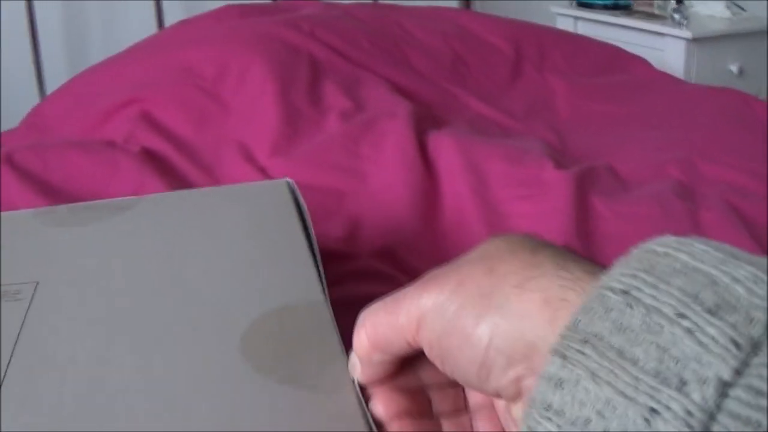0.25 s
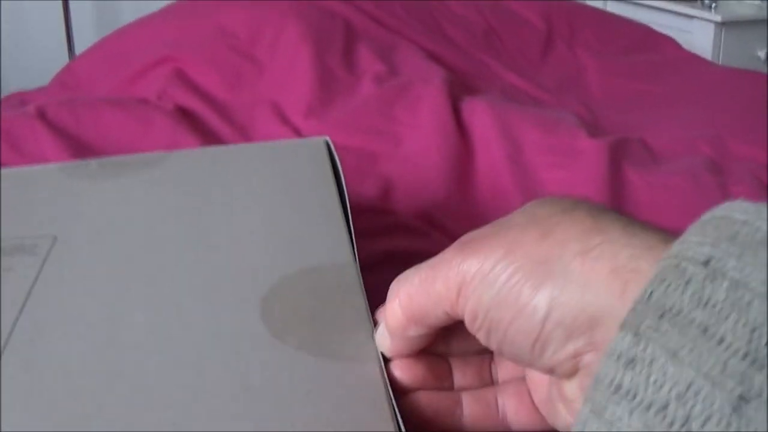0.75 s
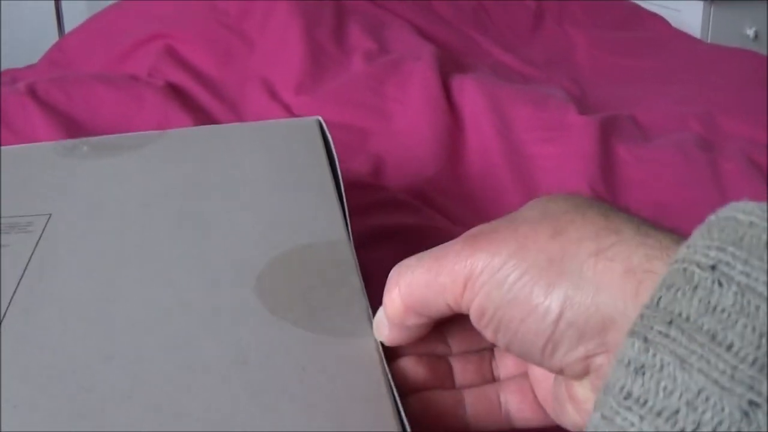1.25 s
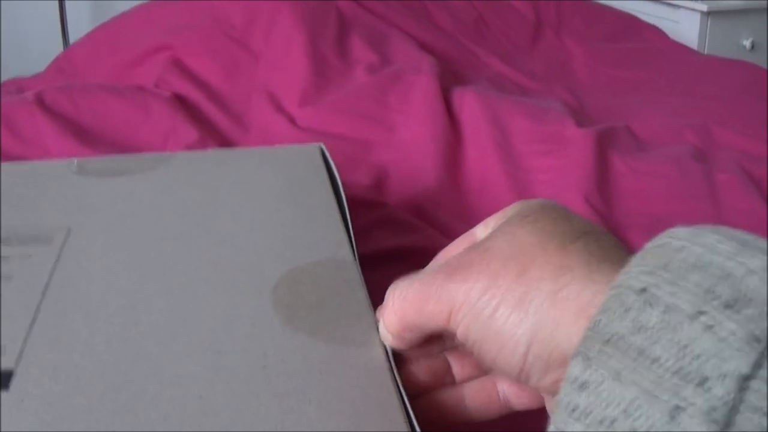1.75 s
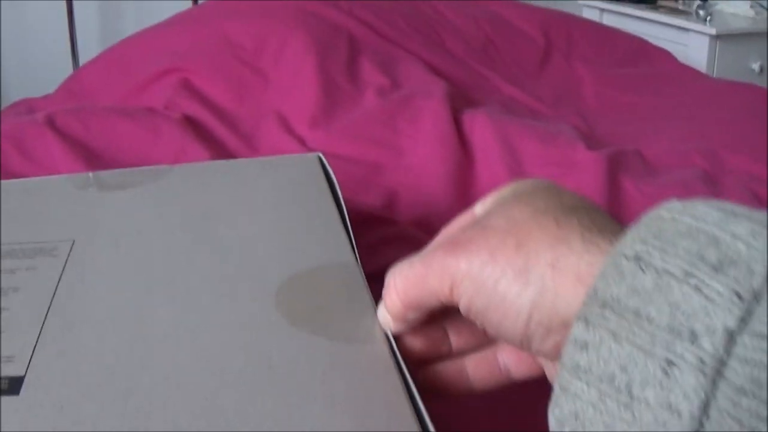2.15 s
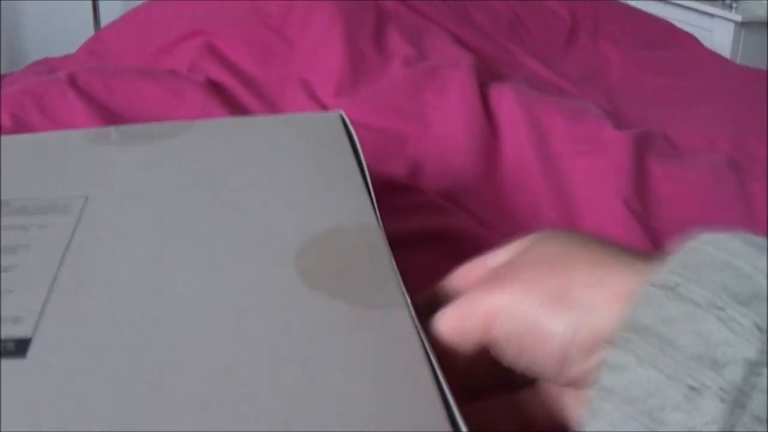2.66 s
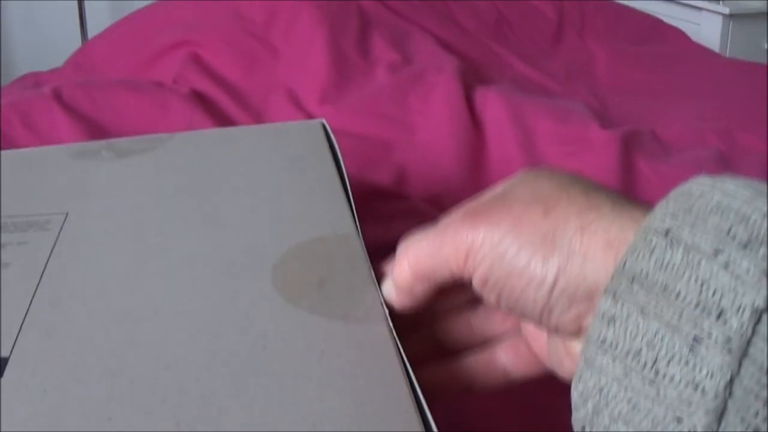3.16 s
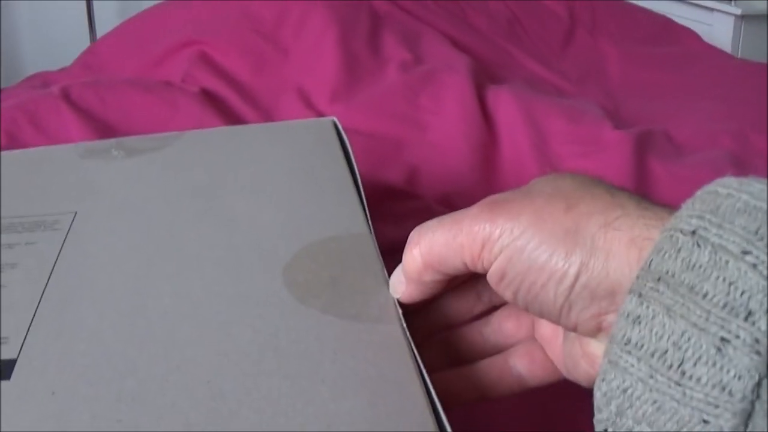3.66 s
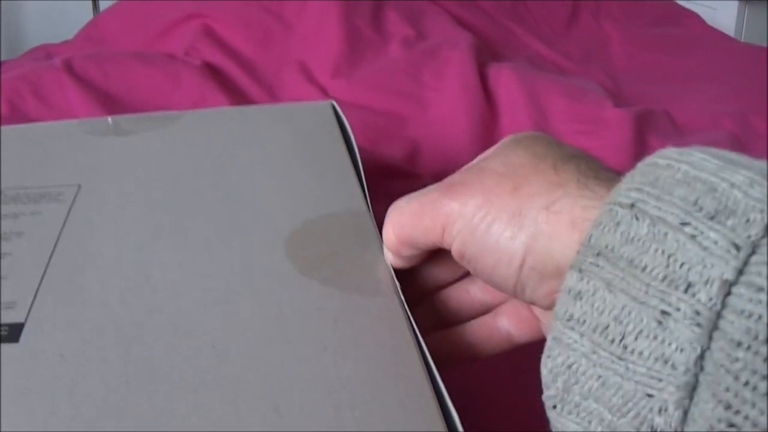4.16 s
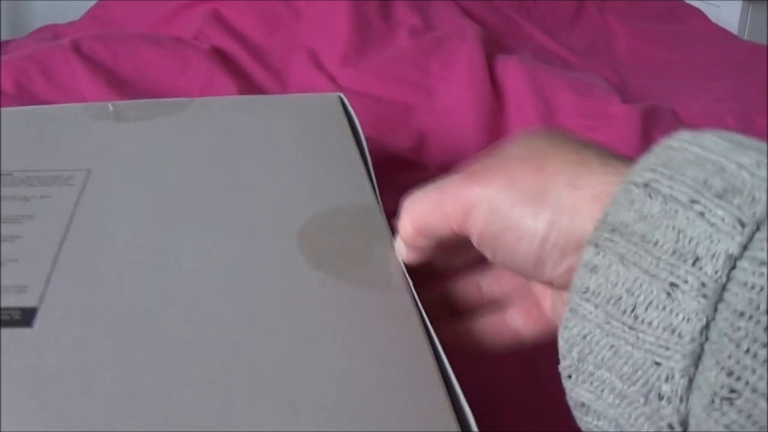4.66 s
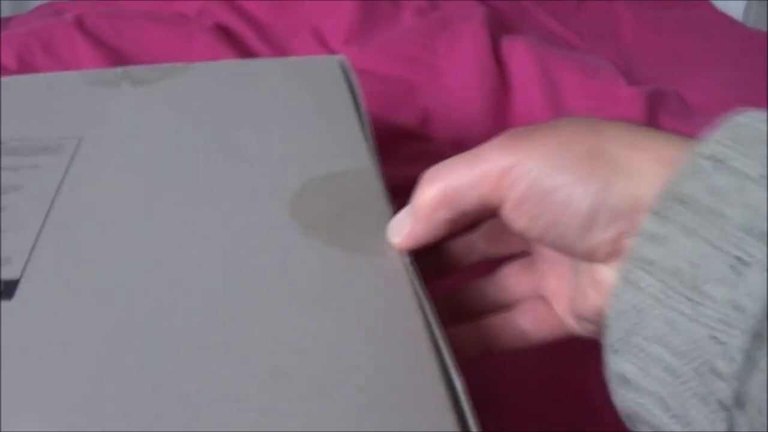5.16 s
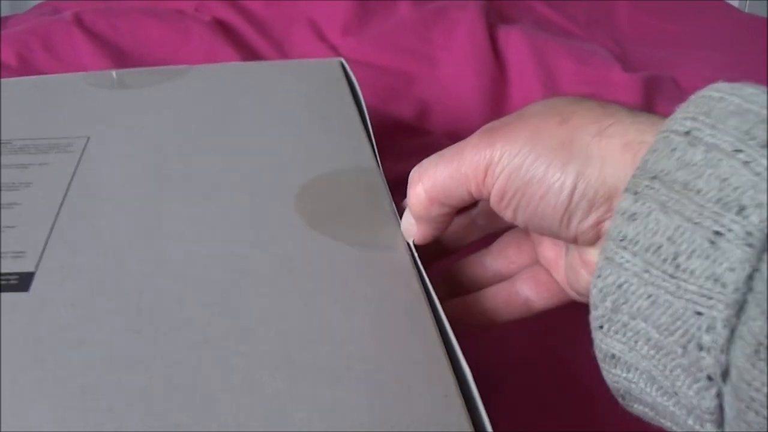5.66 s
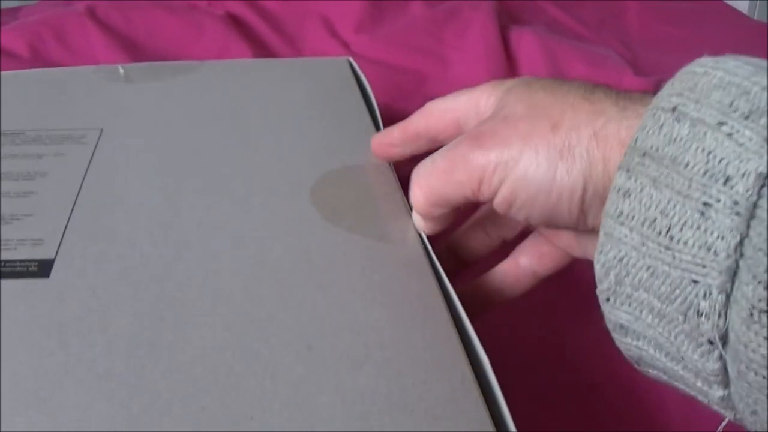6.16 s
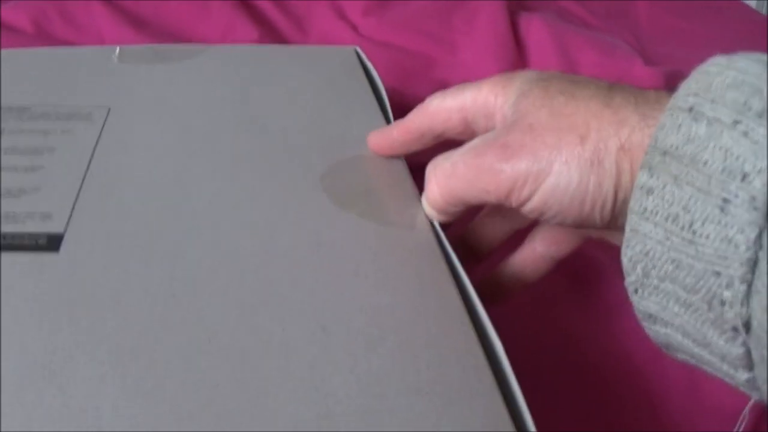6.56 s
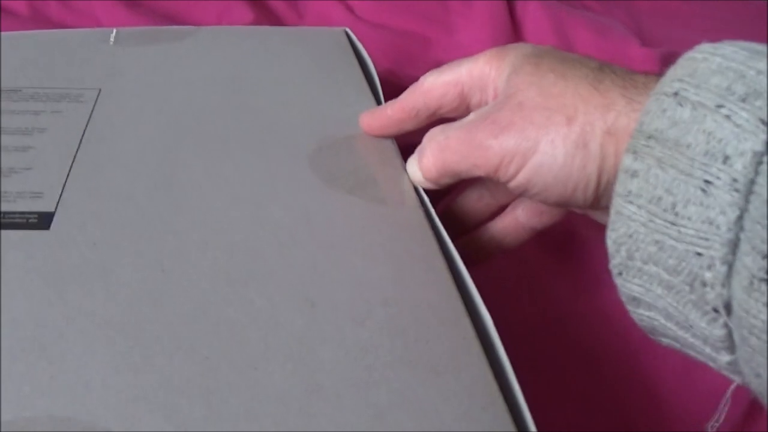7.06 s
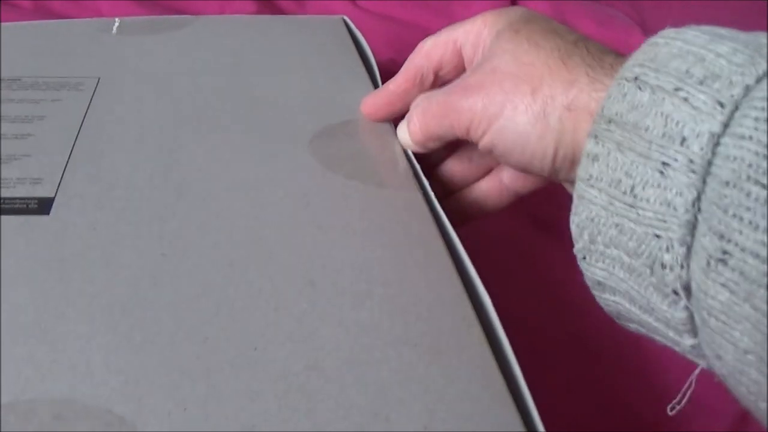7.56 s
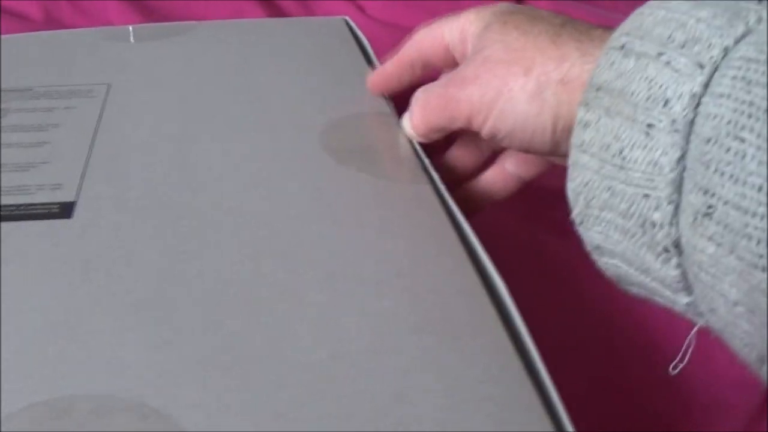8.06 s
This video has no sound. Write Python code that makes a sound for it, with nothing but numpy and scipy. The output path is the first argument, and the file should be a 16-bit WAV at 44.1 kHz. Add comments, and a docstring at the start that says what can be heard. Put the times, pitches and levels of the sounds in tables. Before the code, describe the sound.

Close, dry indoor sound with soft microphone hiss, a very faint high whine and tiny lens motor ticks about twenty-five times a second. From 0 to 0.3 s a nail rubs briskly on cardboard, airy and raspy with low box rumble; another stroke comes at 0.5, then small clicks and soft knocks until 1.25. Light rubbing leads to a sharp click at 1.75 and a loud bright snap with a hollow thump at 1.81. A crisp tick falls at 2.4, then a crackling, thudding cluster from 2.5 to 2.75 and a click at 2.9. A barely audible whirr follows at 3.1 amid quiet rubbing. Knocks and clicks come at 4.36 and, deeper, 4.91. Gentle strokes continue, with slight motor ticks and chirps from 5.5 to 7.05. The loudest crack hits at 6.97. Thin edge scraping follows around 7.5, a quick coarse flick at 8.0, and a last click at 8.12.

```python
"""A thumbnail rubs, picks and snaps at the flap of a cardboard box on a bed, close to a camera.
Rubbing is banded noise for skin, board and box plus random fibre clicks, shaped by stroke envelopes.
Snaps are crackle bursts with one sharp release; they and soft knocks excite the modes of the box.
An edge drag, a flick and two faint whirrs are shaped noise; snaps and ticks leave a short room tail.
The camera adds hiss, steady whines and the regular steps, a few louder ticks and chirps of its lens motor."""
import sys
import numpy as np
from scipy import signal
from scipy.io import wavfile
from scipy.ndimage import uniform_filter1d

SR = 44100
rng = np.random.default_rng(int(sys.argv[2]) if len(sys.argv) > 2 else 0)


def wav_out(sig):
    """Save sig, one row per channel (or a flat mono array), as 16-bit PCM at SR to the path in sys.argv[1]."""
    wavfile.write(sys.argv[1], SR, np.round(np.clip(np.atleast_2d(sig).T, -1, 1) * 32767).astype(np.int16))


N = 366030

# phase lead of left over right: f/Hz, phase/rad
PORT_PHASE = [(0, 0.24), (1210, -0.068), (1550, -0.67), (3880, 0.022), (16500, -0.019)]
# level of left over right: f/Hz, level/dB
PORT_BALANCE = [(60, 0.0), (150, 0.0), (380, 0.45), (950, 0.35), (2380, 0.0), (5980, 0.0), (15000, 0.0)]
# left-right likeness of near sounds: f/Hz, correlation/1
HAND_SAME = [(60, 1), (150, 0.99), (380, 0.97), (950, 0.53), (2400, 0.83), (6000, 0.96), (9000, 0.97),
             (11000, 1)]
# colour of rasping and tearing board: f/Hz, relative level/dB per Hz
BOARD = [(240, -21), (400, -0.5), (496, -8.5), (556, -12.5), (915, -10.5), (1190, -15), (1340, -12.5),
         (6000, -21.5), (7800, -46), (13200, -120)]


def gain_of(db):
    """Decibels to amplitude gain."""
    return 10 ** (np.asarray(db) / 20)


def evened(x):
    """Scales to rms 1."""
    return x / np.sqrt(np.mean(x ** 2) + 1e-20)


def read(points, hz):
    """Interpolates a table on a log-frequency axis."""
    f, value = np.transpose(points)
    return np.interp(np.log(hz + 1), np.log(f + 1), value)


def follow(rows, column):
    """Gain over time from a dB column; silent outside the rows."""
    rows = np.array(rows)
    t = np.arange(N) / SR
    return gain_of(np.interp(t, rows[:, 0], rows[:, column], -200, -200))


def add(mix, s, sound):
    """Mixes a sound in at s seconds, cut at the end."""
    part = mix[..., round(s * SR):][..., :sound.shape[-1]]
    part += sound[..., :part.shape[-1]]


def hiss(colour, same, patchy_db, flicker_db, size=512, count=N):
    """Two-port coloured noise, rms 1, with drifting spectral patches and a flicker shared by all bands."""
    frames, hz = 4 * count // size + 6, np.fft.rfftfreq(size, 1 / SR)
    a, b, c, d, patches = rng.standard_normal((frames, len(hz), 5)).T
    patches = uniform_filter1d(patches, 8, 0)  # over bins
    patches = evened(uniform_filter1d(patches, 10, 1))  # over frames
    flicker = evened(uniform_filter1d(rng.standard_normal(frames), 3))

    alike = np.clip(read(same, hz), -1, 1)[:, None]
    left = a + 1j * b
    right = alike * left + np.sqrt(1 - alike ** 2) * (c + 1j * d)
    ports = gain_of(read(PORT_BALANCE, hz) / 2) * np.exp(.5j * read(PORT_PHASE, hz))
    spectrum = np.array([left, right]) * np.array([ports, 1 / ports])[..., None]

    shape_db = np.where(hz <= colour[-1][0], read(colour, hz), -200)
    spectrum *= gain_of(shape_db[:, None] + patchy_db * patches + flicker_db * flicker)
    noise = signal.istft(spectrum, nperseg=size, noverlap=3 * size // 4)[1]
    return evened(noise[:, :count])


def peaked(resonances):
    """Power spectrum of a few resonances, as f/Hz and level/dB per Hz."""
    hz = np.geomspace(300, 15700, 500)
    power = sum(gain_of(2 * db) / (1 + (2 * (hz - f) / width) ** 2) ** 2 for f, width, db in resonances)
    return np.c_[hz, 10 * np.log10(power)]


def coloured(x, shape_db):
    """Causal filter: minimum phase from a gain in dB on 1025 bins."""
    both_sides_db = np.r_[shape_db, shape_db[-2:0:-1]]
    log_gain = np.log(gain_of(np.maximum(both_sides_db, -100)))
    taps = np.fft.ifft(np.exp(signal.hilbert(log_gain).conj())).real[:1024]
    return signal.fftconvolve(x, taps)


def swell(t, peak_s, rise_s, fall_s, rise_power=1., fall_power=1.):
    """Gesture level in dB: 0 at its peak, -10 one rise before and one fall after; powers > 1 round it."""
    early = t < peak_s
    away = abs(t - peak_s) / np.where(early, max(rise_s, .002), max(fall_s, .002))
    return -10 * away ** np.where(early, rise_power, fall_power)


def rings(blow, weight_db, damping):
    """Box modes excited by a short blow, peak 1; random shifts of pitch and phase vary each blow."""
    # box modes: nominal f/Hz, level/dB before weighting, t60/s before the damping factor
    box_modes = [(61.6, -6, 0.12), (92.4, 2, 0.13), (117.5, -6, 0.2), (144, -0.5, 0.045), (188, 2, 0.12),
                 (250.6, 3.5, 0.083), (357, -3.5, 0.1), (416, -7, 0.097), (590, -6.5, 0.071),
                 (778, -6, 0.038), (1090, -9.5, 0.032), (1370, -17.5, 0.03), (1550, -4, 0.019),
                 (2070, -14.5, 0.042), (2740, -16, 0.068)]
    hz, db, t60 = np.transpose(box_modes)[..., None]
    t = np.arange(SR // 4) / SR
    shift, lag = rng.standard_normal((2, len(box_modes), 1))
    swing = np.sin(2 * np.pi * hz * (1 + 0.04 * shift) * t + 0.8 * lag)
    rise = 1 - np.exp(-t * hz / 0.35)  # a panel needs part of a cycle to swing up
    modes = gain_of(db + weight_db(hz) - 60 * t / (t60 * damping)) * rise * swing
    sound = signal.fftconvolve(modes.sum(0), blow)
    return sound / abs(sound).max()


def camera():
    """Room and microphone hiss, steady sine whines, decaying lens motor steps and short tone chirps."""
    # whines: f/Hz, rms level/dB
    whine_tones = [(7801, -65), (7826, -73)]
    # ringing of a motor step: f/Hz, level re step/dB, t60/s
    step_rings = [(2805, -2, 0.032), (3270, 2, 0.016)]
    # lens motor chirps: t/s, peak level/dB, length/ms
    chirp_rows = [(6.534, -47, 17), (6.554, -48, 18), (6.652, -44, 13), (6.777, -48, 20), (6.8543, -47, 14),
                  (6.8788, -53, 18), (7.0549, -44.5, 13)]
    # room and microphone hiss: f/Hz, relative level/dB per Hz
    air_colour = [(12, -30), (20, 2.5), (85, -9), (104, -11.5), (584, -4), (635, -6.5), (710, -7.5),
                  (1280, -10), (1780, -11.5), (2290, -12), (3200, -12), (6430, -20), (7600, -18),
                  (8270, -23.5), (15700, -20.5)]
    # left-right likeness of that hiss: f/Hz, correlation/1
    air_same = [(60, 1), (150, 0.62), (380, 0.24), (950, 0.027), (2400, 0.055), (6000, 0.17), (9000, 0.79),
                (11000, 1)]
    first_step_s, step_period_s, step_db, step_spread_db = .014, 1 / 25, -52, 1.5
    chirp_hz, air_db = 2770, -54

    t = np.arange(N) / SR
    out = sum(gain_of(db) * np.sqrt(2) * np.sin(2 * np.pi * hz * t) for hz, db in whine_tones)

    at = np.round(np.arange(first_step_s, N / SR, step_period_s) * SR).astype(int)
    t = np.arange(800) / SR
    for hz, db, t60 in step_rings:
        steps = np.zeros(N)
        steps[at] = gain_of(step_db + step_spread_db * rng.standard_normal(len(at)))
        ring = gain_of(db - 60 * t / t60) * np.sin(2 * np.pi * hz * t)
        out += signal.oaconvolve(steps, ring)[:N]

    for s, db, ms in chirp_rows:
        t = np.arange(round(ms * SR / 1000)) / SR
        add(out, s, gain_of(db) * np.hanning(len(t)) * np.sin(2 * np.pi * chirp_hz * t))

    return out + gain_of(air_db) * hiss(air_colour, air_same, patchy_db=1.5, flicker_db=0.5, size=1024)


def whirr():
    """Faint fuzzy whirrs: noise in one narrow band with short linear fades."""
    # whirrs: start t/s, length/s, level/dB, f/Hz
    whirr_rows = [(3.11, .34, -60.5, 1334), (7.888, .1, -58, 1420)]
    fade_s, width_hz = .01, 100
    out = np.zeros((2, N))
    for s, length, db, hz in whirr_rows:
        t = np.arange(round(length * SR)) / SR
        band = hiss(peaked([(hz, width_hz, 0)]), HAND_SAME, patchy_db=.3, flicker_db=.8, count=len(t))
        fade = np.clip(np.minimum(t, length - t) / fade_s, 0, 1)
        add(out, s, gain_of(db) * fade * band)
    return out


def bedroom(x, t60=0.17, treble_t60=0.038):
    """Sparse reflections of random sign; cloth swallows the treble first."""
    taps = np.zeros((2, SR // 4))
    slots = np.arange(120, SR // 4 - 20, 20)
    at = slots + rng.integers(0, 20, (2, (SR // 4 - 121) // 20))
    np.put_along_axis(taps, at, rng.choice([-1., 1.], at.shape), 1)

    hz, t, (mid, side) = signal.stft(taps, SR, nperseg=128)
    # the tail is widest around 5 kHz, narrower in bass and top treble
    side = side * gain_of(read([(300, -12), (1500, -6), (5000, -3), (10000, -10)], hz))[:, None]
    decay_s = read([(800, t60), (6000, treble_t60)], hz)[:, None]
    faded = np.array([mid + side, mid - side]) * gain_of(-60 * t / decay_s)
    tail = signal.istft(faded, SR, nperseg=128)[1]
    return signal.fftconvolve(x[None], tail / np.linalg.norm(tail[0]), axes=1)[:, :N]


def flick():
    """One quick flick across the board: a short coarse noise scrape."""
    # scrape colour: f/Hz, relative level/dB per Hz
    scrape_colour = [(180, -36), (300, -12), (554, -11), (852, -1), (1070, -19), (1620, -4), (2580, -5.5),
                     (3050, -6), (4460, -4.5), (6210, -5.5), (7210, -9.5), (10400, -10), (15700, -23)]
    peak_s, level_db, rise_s, fall_s, lead_s = 8.01, -26.5, .012, .014, .05
    t = np.arange(SR // 4) / SR
    scrape = hiss(scrape_colour, HAND_SAME, patchy_db=1.0, flicker_db=-0.5, size=128, count=len(t))
    level = gain_of(level_db + swell(t, lead_s, rise_s, fall_s, rise_power=2.2))
    out = np.zeros((2, N))
    add(out, peak_s - lead_s, scrape * level)
    return out


def drag():
    """The nail drags along the cut edge: noise in three resonant bands."""
    # drag level: t/s, level/dB
    drag_levels = [(7.2, -61), (7.378, -55.5), (7.388, -48), (7.43, -56), (7.472, -44.5), (7.552, -45),
                   (7.59, -56), (7.68, -62), (7.742, -54), (7.85, -62)]
    # edge resonances: f/Hz, -6 dB width/Hz, level/dB
    edge_rings = [(4620, 510, 0), (6070, 700, -0.5), (8800, 500, -10)]
    return follow(drag_levels, 1) * hiss(peaked(edge_rings), HAND_SAME, patchy_db=1.5, flicker_db=0.9)


def knocks():
    """A soft push of about 2 ms rings the box modes, favouring those near one frequency."""
    # knocks on the box: t/s, peak level/dB, favoured f/Hz, damping as factor on t60
    knock_rows = [(0.599, -30, 250, 0.51), (0.651, -26.5, 159, 0.9), (0.67, -36, 102, 0.58),
                  (0.846, -29, 94.2, 1), (0.907, -28, 261, 0.97), (1.048, -27, 191, 0.98),
                  (1.232, -26.5, 88, 0.86), (1.75, -32.5, 240, 0.9), (1.812, -12, 172, 0.62),
                  (1.864, -38, 138, 0.9), (2.325, -29, 80.7, 0.77), (2.347, -31, 86.1, 1),
                  (2.398, -36, 164, 0.58), (2.527, -32, 188, 0.86), (2.617, -13.5, 158, 0.72),
                  (2.641, -23.5, 117, 0.74), (2.658, -15.5, 243, 0.69), (2.684, -31, 323, 0.48),
                  (2.89, -31.5, 253, 0.82), (3.146, -37, 352, 0.9), (3.581, -39.5, 185, 1),
                  (3.843, -40.5, 264, 0.93), (4.355, -23, 228, 1), (4.551, -46, 83.4, 0.53),
                  (4.848, -41, 200, 0.9), (4.912, -15.5, 80.7, 0.58), (4.95, -29, 186, 0.9),
                  (5.035, -33, 229, 1), (5.496, -39, 86.1, 0.76), (5.651, -37, 224, 1),
                  (6.966, -14, 117, 0.76), (7.385, -34.5, 128, 0.6), (7.499, -34, 93, 0.9),
                  (7.768, -38.5, 125, 0.43), (8.004, -37, 129, 0.97), (8.124, -34.5, 125, 0.9)]
    out, push = np.zeros(N), np.hanning(90)
    for s, db, deep_hz, damping in knock_rows:
        near = lambda f: -8. * abs(np.log2(f / deep_hz))  # dB
        add(out, s, gain_of(db) * rings(push, near, max(damping, .2)))
    return out


def fibres(per_s=500, spread_db=3.0):
    """Single board fibres tear at random, a few of them loudly: filtered impulses, rms 1."""
    size = gain_of(spread_db * np.minimum(rng.exponential(1, N), 4)) * rng.choice([-1, 1], N)
    tears = size * (rng.random(N) < per_s / SR)
    return evened(coloured(tears, read(BOARD, np.fft.rfftfreq(2048, 1 / SR)))[:N])


def contact():
    """Gains of hiss, rasp and rumble: resting hand, strokes and shudders add as powers."""
    # hand resting between strokes: t/s, skin hiss/dB, board rasp/dB, box rumble/dB
    resting_rows = [(0, -60, -48, -47), (0.75, -57, -54, -50), (1.301, -66, -55.5, -51),
                    (1.75, -53, -61, -53.5), (2.0, -62, -56.5, -50.5), (2.9, -62, -61.5, -59),
                    (3.4, -63, -58, -53), (3.72, -63.5, -67, -62.5), (4.3, -67, -57.5, -51),
                    (5.4, -64, -60, -55.5), (6.1, -65, -65.5, -61), (6.55, -63, -64, -52.5),
                    (6.85, -60, -60, -56), (7.25, -60, -61.5, -50), (7.7, -65, -62, -56),
                    (8.3, -63, -57, -55)]
    # strokes along the board: peak t/s, 10 dB rise/s, 10 dB fall/s, skin hiss/dB, board rasp/dB, box rumble/dB
    stroke_rows = [(0.02, .1, .045, -36, -41.5, -45), (0.125, .03, .04, -37.5, -42, -42),
                   (0.205, .02, .03, -45, -43, -39), (0.28, .06, .2, -32, -41, -46),
                   (0.5, 0.16, .045, -37, -46, -60), (0.56, 0.035, .03, -66, -58, -40),
                   (0.656, .05, .045, -47, -45, -38), (0.745, .03, .03, -51, -48, -43),
                   (0.877, 0.09, 0.092, -44.5, -40.5, -40), (1.043, 0.058, .045, -52.5, -50, -42),
                   (1.17, .03, .03, -55, -50, -52), (1.225, .03, .02, -54, -50, -55),
                   (1.537, .2, 0.11, -50, -50.5, -50), (1.756, .04, .02, -48, -58, -56),
                   (2.01, .05, .06, -57, -56, -51), (2.202, .17, .13, -48.5, -62, -63),
                   (2.407, 0.037, 0.079, -51, -51.5, -41.5), (2.585, .05, .04, -47, -62, -55),
                   (2.735, .04, .07, -49, -42, -34.5), (3.031, .07, 0.04, -59, -57, -53),
                   (3.235, .1, .05, -56, -55, -47), (3.874, 0.097, 0.23, -58.5, -57.5, -55.5),
                   (4.121, 0.098, .1, -53, -57, -57), (4.305, .07, .07, -48, -59, -51),
                   (4.56, .09, .2, -51.5, -57.5, -48.5), (4.85, 0.13, .1, -48.5, -54, -50.5),
                   (4.97, .05, .025, -49, -44, -44), (5.036, .03, .11, -50.5, -49.5, -49.5),
                   (5.266, 0.042, 0.044, -52, -49, -55), (5.75, 0.2, 0.11, -54, -56, -52),
                   (5.857, .08, 0.042, -51, -61, -60), (5.956, 0.058, 0.16, -57, -56, -51.5),
                   (6.19, .08, .12, -51.5, -52, -51), (6.4, 0.051, .045, -47.5, -50, -53),
                   (6.515, 0.053, .08, -55.5, -50.5, -51.5), (6.67, .1, 0.051, -60, -57, -55),
                   (6.787, 0.087, .2, -55, -62, -62), (7.075, .04, .05, -60, -56, -46),
                   (7.141, 0.047, .08, -55, -57.5, -50), (7.393, 0.094, .08, -50.5, -55, -48.5),
                   (7.498, .07, 0.11, -46.5, -54.5, -54), (7.79, .12, .13, -49, -54, -54),
                   (7.94, .04, .05, -52, -55, -51.5), (8.1, 0.065, .15, -59, -54, -52),
                   (8.299, 0.12, .1, -54, -54.5, -54)]
    # flap slips, box shudders: peak t/s, skin hiss/dB, board rasp/dB, box rumble/dB
    shudder_rows = [(1.826, -45, -43, -29), (1.88, -56, -57, -39), (2.34, -68, -54, -44),
                    (2.537, -52, -46, -39), (2.63, -46, -37, -27), (2.671, -40.5, -34.5, -27),
                    (4.37, -59, -51.5, -49), (4.925, -39, -38.5, -37), (6.977, -45.5, -37, -38),
                    (8.0, -61, -45, -43), (8.04, -61, -46, -44)]
    rise_round, fall_round = 1.3, 1.55  # 1 = pointed, 2 = rounded: a stroke holds, then stops short
    shudder_rise_s, shudder_fall_s = 0.013, 0.047  # for 10 dB

    t = np.arange(0, N / SR, 1 / 1000)
    rest = np.transpose(resting_rows)
    power = gain_of([2 * np.interp(t, rest[0], db) for db in rest[1:]])
    for s, rise_s, fall_s, *db in stroke_rows:
        level_db = np.c_[db] + swell(t, s, rise_s, fall_s, rise_round, fall_round)
        power = power + gain_of(2 * level_db)
    for s, *db in shudder_rows:
        level_db = np.c_[db] + swell(t, s, shudder_rise_s, shudder_fall_s)
        power = power + gain_of(2 * level_db)
    return [np.interp(np.arange(N) / SR, t, gain) for gain in np.sqrt(power)]


def hand():
    """Rubbing: fine fibres hiss, the board rasps and crackles, the box rumbles as it is pushed."""
    # skin hiss colour: f/Hz, relative level/dB per Hz
    skin_colour = [(1500, -14), (2600, -9), (3700, -11), (5700, -7.5), (7000, -4), (8500, -2.5), (9600, -4),
                   (10500, -9), (12500, -15), (15700, -25)]
    # box rumble colour: f/Hz, relative level/dB per Hz
    rumble_colour = [(12, -43), (20, 4.5), (87, -3), (129, 0), (248, 0.5), (307, -5), (496, -10.5),
                     (536, -10), (800, -19), (1040, -49), (1760, -120)]
    skin = hiss(skin_colour, HAND_SAME, patchy_db=1.5, flicker_db=1.0, size=256)
    rasp = hiss(BOARD, HAND_SAME, patchy_db=3.0, flicker_db=0.5, size=256)
    rasp = rasp + 0.46 * fibres()
    rumble = hiss(rumble_colour, HAND_SAME, patchy_db=2.0, flicker_db=2.5, size=1024)
    return sum(gain * layer for gain, layer in zip(contact(), (skin, rasp, rumble)))


def snaps_and_ticks():
    """Nail snaps: fibres crackle, one sharp release, a dry board ring; a few ticks share this recipe."""
    # nail snaps, a few louder lens motor ticks (5.495, 5.5333, 6.136)
    # and faint clicks as each whirr starts (3.113, 7.8898):
    # t/s, tick peak level/dB, brightest f/Hz, treble tilt/dB per 5 kHz (0 at 5 kHz),
    # ring rms level/dB over its first 250 samples, favoured ring f/Hz, left over right/dB
    snap_rows = [(0.9064, -27, 8100, 0, -24.5, 1330, 0), (1.034, -29.5, 6760, -5, -39, 902, -0.5),
                 (1.049, -26, 5340, 0, -35, 1420, -0.5), (1.167, -34, 7820, -2, -47.5, 1570, -0.5),
                 (1.2326, -34, 7700, -5, -41, 815, 3), (1.7506, -10, 7400, -1, -40, 1590, 1),
                 (1.814, -3, 9400, 5, -25, 1640, 0.5), (1.8667, -37, 7560, 0, -50, 791, 2),
                 (2.3255, -29, 3320, -7, -32, 760, 1), (2.348, -48, 7800, 0, -41, 848, -0.5),
                 (2.3981, -11, 9700, 3.1, -33, 1580, 1), (2.526, -18, 4120, 2, -29.5, 1600, -1.0),
                 (2.6182, -30, 7820, 0, -26.5, 786, -0.5), (2.659, -17.5, 3330, -5, -28.5, 780, -4),
                 (2.678, -19.5, 7680, 0, -30, 856, -0.5), (2.6864, -22, 3660, 0, -32.5, 1470, -0.5),
                 (2.7356, -26, 4030, -5, -39.5, 783, 0.0), (2.8914, -25, 5840, 0.5, -34.5, 1580, -1.0),
                 (3.113, -57, 7830, 0, -47, 1330, 1.0), (4.3612, -22, 6200, -0.5, -34, 760, 1.5),
                 (4.9124, -19.5, 3300, -2, -41, 818, -0.5), (4.9538, -36, 3200, 0, -41, 853, -1.0),
                 (4.9794, -36, 3920, 4, -43.5, 2100, -0.5), (5.0335, -30, 7750, -10, -46, 859, -3),
                 (5.096, -42, 7810, 0, -45.5, 958, 0.0), (5.1568, -45, 3220, 0, -49, 1490, 1.0),
                 (5.368, -44, 7810, 0, -51, 2710, -0.5), (5.495, -34, 7800, 1, -50, 883, 0.0),
                 (5.5333, -31, 7810, 3, -61, 2760, 4), (5.926, -32, 4290, 3, -57, 2760, -6),
                 (6.136, -31, 3520, 2, -51, 2510, 3), (6.157, -34, 3700, -8, -54, 2230, -2),
                 (6.6194, -49, 7820, 2, -45.5, 860, 0.0), (6.9663, 0.5, 4580, -1, -21.5, 790, -2),
                 (7.1354, -23.5, 4630, -2, -53, 850, -2), (7.3867, -29, 4670, -2, -48, 791, -1.5),
                 (7.7707, -44, 8410, 0, -50, 910, -4), (7.8302, -32, 8060, -5, -46, 869, -2),
                 (7.8898, -47, 7820, 0, -45, 1410, 2), (8.1237, -22, 6510, 3, -48, 2800, -3)]
    # tick colour: f/Hz, filter gain/dB
    nail_colour = [(900, -25.5), (1600, -4.5), (3300, -1.5), (5500, -0.5), (8000, -1), (10500, -4),
                   (12700, -12.5), (16800, -17.5)]
    crackle_ms, release_share = 1.65, .62  # time scale; share 0-1 of the sharp release

    out, hz = np.zeros((2, N)), np.fft.rfftfreq(2048, 1 / SR)
    length = SR * crackle_ms / 1000
    t = np.arange(800) / length
    for s, db, bright_hz, edge_db, board_db, board_hz, pan_db in snap_rows:
        crackle = (1 - release_share) * rng.choice([-1, 1], 800) * t * np.exp(1 - 2 * t)
        crackle[round(length / 2)] -= 2 * release_share  # release at the crackle's height
        bump_db = 6.8 * np.exp(-(np.log((hz + 1) / bright_hz) / 0.06) ** 2)
        tilt_db = edge_db * np.clip(hz / 5000 - 1, -.7, 2)
        tick = coloured(crackle, read(nail_colour, hz) + bump_db + tilt_db)
        tick /= abs(tick).max()

        # dB: favours modes near board_hz, weaker below 700 Hz
        near = lambda f: -7. * abs(np.log2(f / board_hz)) + 8.9 * np.log2(np.minimum(f / 700, 1))
        ring = rings(np.hanning(12), near, damping=0.33)
        ring /= ring[:250].std()

        pan = np.array([[pan_db / 2], [-pan_db / 2]])
        add(out, s, gain_of(db + pan) * tick)
        add(out, s + crackle_ms / 4000, gain_of(board_db + pan) * ring)  # a quarter of crackle_ms later
    return out


def scene():
    """Hand and box close by, a little of the room behind the snaps and ticks, the camera beneath."""
    sharp = snaps_and_ticks()
    room = gain_of(-16) * bedroom(sharp.mean(0))
    return sharp + room + knocks() + hand() + drag() + flick() + whirr() + camera()


def record(dry):
    """The microphone loses the deepest bass, peaks clip at a ceiling, then a steep low-pass limits the band."""
    ceiling, edge_hz = .88, 16700
    thin = signal.lfilter(*signal.butter(2, 38, "high", fs=SR), dry)
    held = np.clip(thin, -ceiling, ceiling)
    low_pass = signal.firwin(511, edge_hz, window=("kaiser", 9), fs=SR)
    return signal.oaconvolve(held, low_pass[None], "same")


dry = scene()
out = record(dry)
wav_out(out)
```